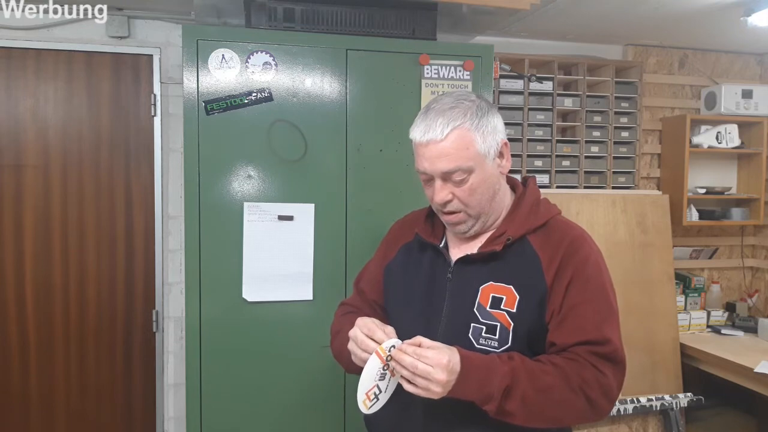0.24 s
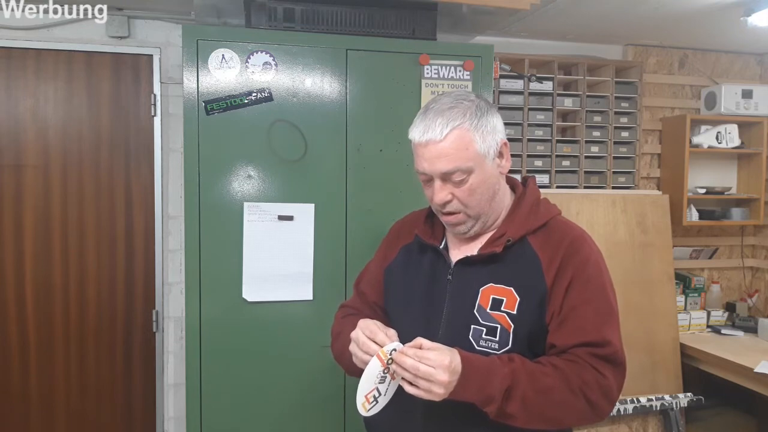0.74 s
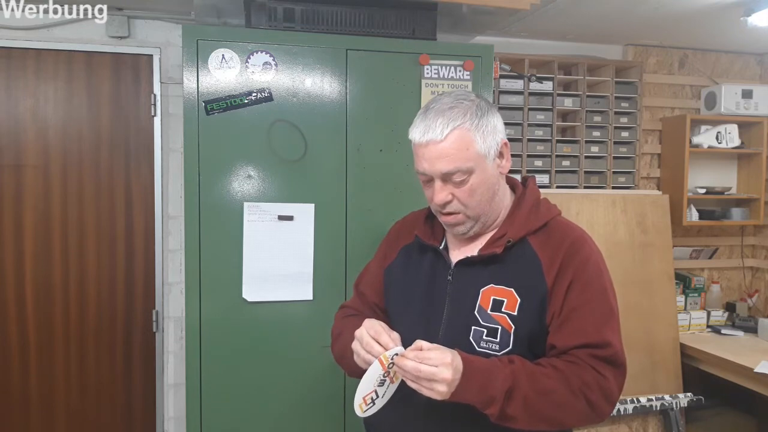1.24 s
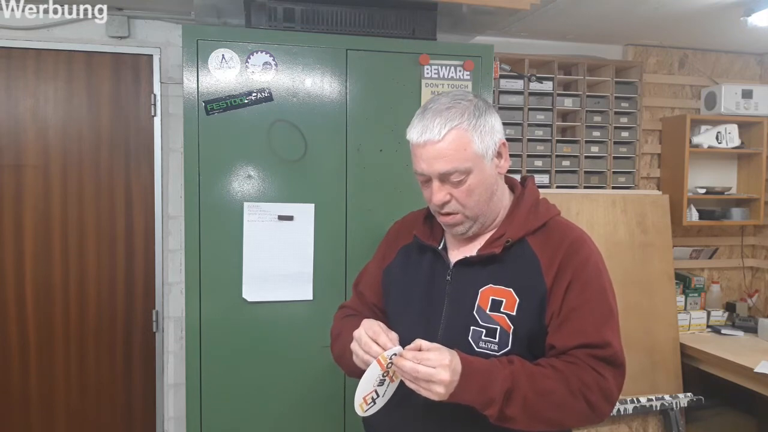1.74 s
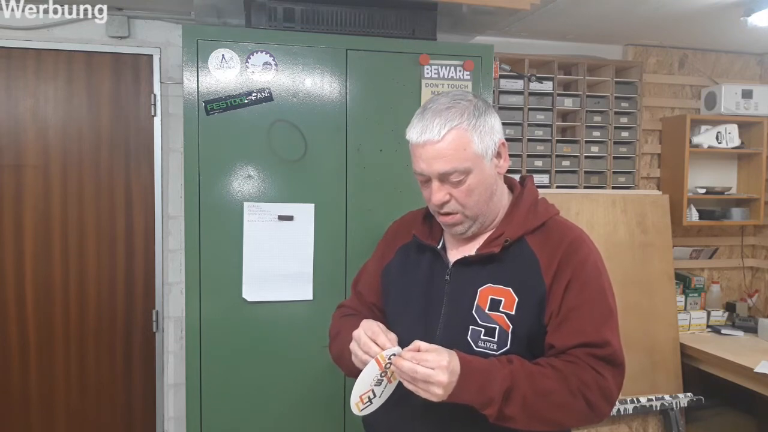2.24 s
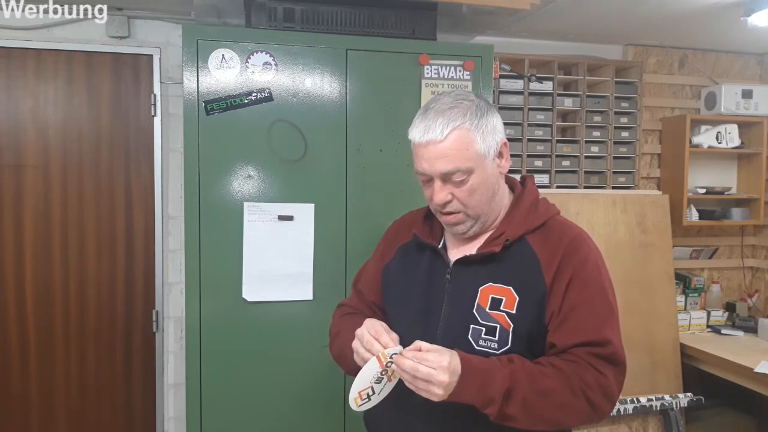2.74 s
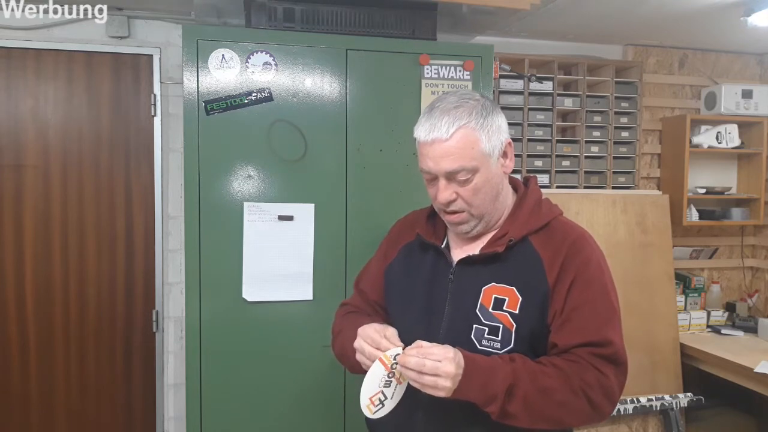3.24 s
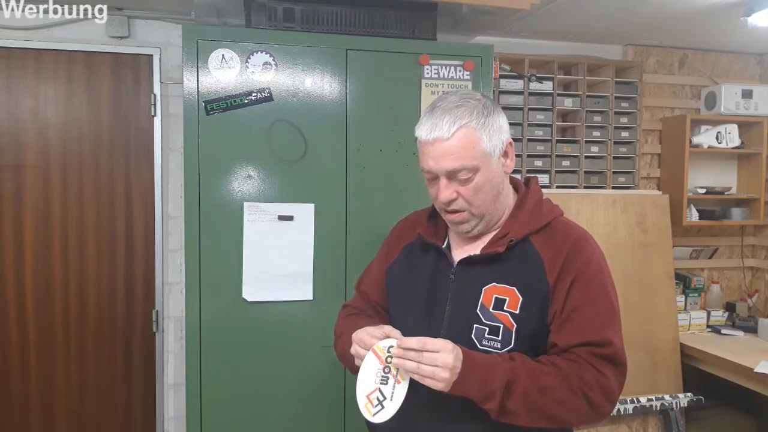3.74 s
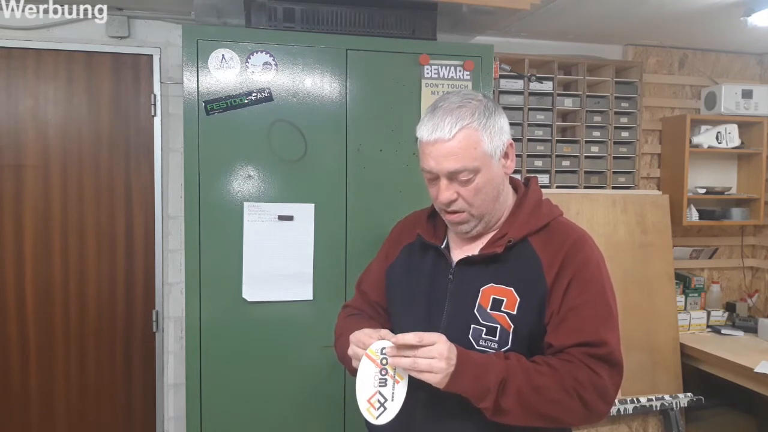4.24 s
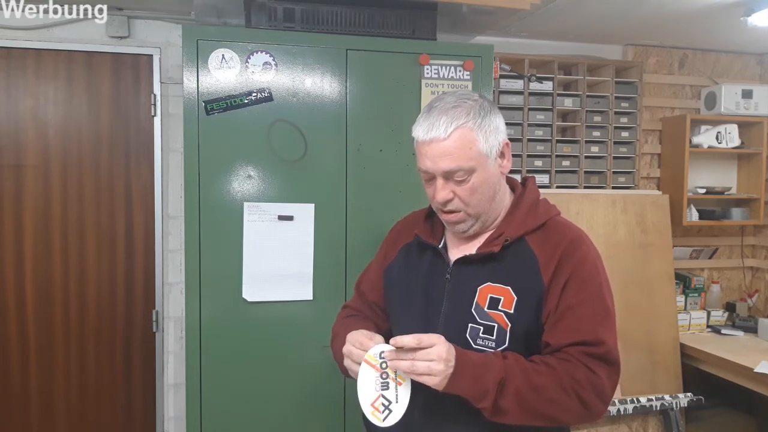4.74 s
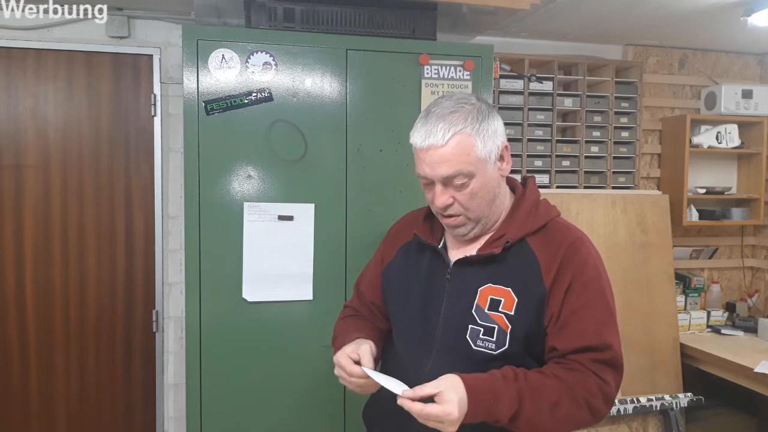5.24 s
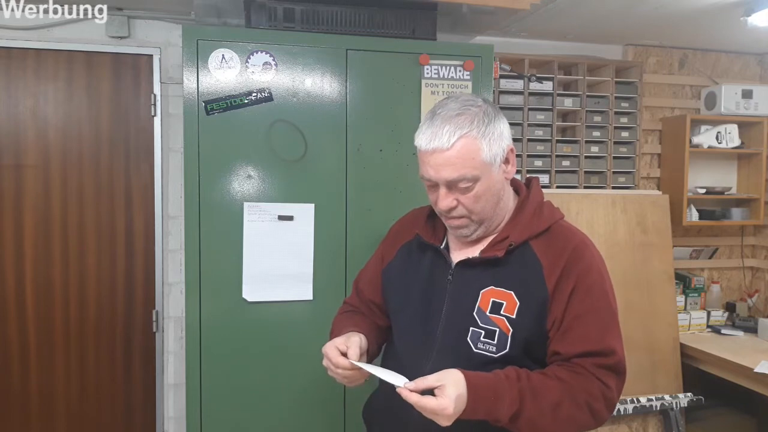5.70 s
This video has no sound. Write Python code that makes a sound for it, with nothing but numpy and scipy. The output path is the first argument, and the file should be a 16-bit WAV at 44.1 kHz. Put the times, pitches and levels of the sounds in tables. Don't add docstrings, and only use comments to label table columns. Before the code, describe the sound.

Fingernails pick at a sticker's stiff backing in a quiet workshop, with a few sharp isolated snaps between faint papery creaks and rustles.

```python
import sys
import numpy as np
from scipy import signal
from scipy.fft import rfft, irfft, next_fast_len
from scipy.io import wavfile

SR = 44100
rng = np.random.default_rng(int(sys.argv[2]) if len(sys.argv) > 2 else 0)


def ratio_of_db(decibels):
    return 10 ** (np.asarray(decibels, float) / 20)


def bounce(signal):
    frames = np.transpose(np.atleast_2d(signal))
    limited = np.clip(frames, -1, 1)
    pcm = np.round(limited * 32767).astype(np.int16)
    wavfile.write(sys.argv[1], SR, pcm)


N = 263265

# hz, density_db [dB per Hz]
HISS_SPECTRUM = [(880, -26), (1500, -7.5), (1630, -9.5), (2220, -2), (2400, -1), (10400, -5.5), (15100, -5),
                 (16000, -2.5), (16500, -36)]
# hz, density_db [dB per Hz]
HISS_SIDE_SPECTRUM = [(15, -24), (25, -9), (124, -5), (232, -14.5), (321, -13.5), (600, -14.5),
                      (651, -15.5), (1010, -16.5), (1390, -17.5), (15200, -16), (16500, -43)]
# hz, density_db [dB per Hz]
AIR_SPECTRUM = [(12, -37), (20, -13), (38, -11), (80, -4.5), (103, -1), (140, -6.5), (231, -14), (374, -10),
                (550, -16), (2000, -21.5), (2600, -57), (4400, -120)]
# low_hz, high_hz
RUMBLE_BANDS = [
    (76, 100.7),
    (100.4, 179),
    (300, 970),
    (175, 330),
]
RUMBLE_IDLE_DB = [-70, -68.5, -72.5, -86]
# peak_s, level_db, fade_s [time to lose 10 dB]
RUMBLE_SWELLS = [
    [(.37, -64.5, 0.067), (.88, -68, .2), (1.36, -54, 0.22), (1.85, -61, .15), (2.02, -58, .1),
     (2.15, -53.5, .15), (2.55, -56.5, .2), (3.32, -59, .1), (3.79, -57.5, .1), (4.37, -58.5, .1),
     (5.26, -55.5, 0.071), (5.9, -67, .1)],
    [(.22, -49.5, 0.086), (.8, -55, .2), (1.31, -51, 0.086), (2.05, -61.5, 0.087), (2.58, -54.5, .15),
     (2.95, -56.5, 0.14), (3.7, -64, 0.13), (4.37, -65, 0.087), (5.25, -63, 0.089), (5.76, -59.5, .15)],
    [(0.02, -67, 0.23), (.72, -59.5, 0.09), (.88, -50.5, 0.13), (2.12, -65, .15), (2.59, -59, 0.091),
     (3.04, -59, 0.059), (3.25, -61.5, 0.26), (3.62, -62, 0.1), (4.9, -58, .08), (5.17, -63.5, 0.072),
     (5.4, -64.5, 0.12), (5.69, -62.5, .06)],
    [(.05, -68.5, 0.28), (1.35, -66, 0.11), (1.9, -64, .15), (2.04, -64, .05), (3.7, -69, .15),
     (4.75, -67, .1)],
]
# delay_s, level_db
ECHOES = [
    (.0033, -5),
    (.007, -8.5),
    (.0103, -7),
]
# hz, t60_s
ROOM_T60 = [(150, 0.79), (500, 0.37), (2000, 0.31), (6000, 0.35), (10000, 0.36), (15000, 0.18)]
# start_s, length_s, level_db, low_hz, high_hz
FLEXES = [(.18, 0.085, -74, 109, 219), (.7, 0.27, -63, 610, 680), (.815, 0.14, -45.5, 382, 1040),
          (.87, 0.14, -57.5, 324, 440), (.85, .1, -76, 1270, 2640), (1.296, 0.022, -57.5, 100, 281),
          (2.505, 0.099, -53, 319, 710), (2.52, 0.046, -70, 755, 1230), (2.53, 0.096, -59.5, 320, 434),
          (2.587, 0.025, -54.5, 736, 856), (2.93, 0.077, -51, 305, 735), (3.12, 0.2, -66.5, 320, 505),
          (3.12, 0.29, -72.5, 1640, 2250), (3.405, 0.015, -61, 1650, 1950), (3.5, 0.2, -71, 300, 457),
          (4.78, 0.16, -65.5, 321, 473), (4.82, .37, -71.5, 600, 2220)]
# start_s, peak_db
SLIPS = [
    [(1.3075, -28), (1.3082, -27), (1.3105, -33)],
    [(2.9208, -16), (2.9213, -14), (2.922, -12)],
    [(3.4045, -48), (3.4085, -38), (3.4105, -33), (3.4185, -34), (3.425, -37), (3.4335, -38)],
    [(3.9515, -27), (3.9522, -27), (3.956, -33)],
    [(4.7152, -22), (4.7197, -12.5), (4.7219, -9), (4.7243, -14)],
]
# hz, density_db [dB per Hz]
PINCHED = [(530, -42), (900, -24), (1430, -23), (1780, -0.5), (2790, -16.5), (6080, -1.5), (8980, -9.5),
           (10600, -34), (15200, -30), (15900, -35), (16500, -62)]
# hz, density_db [dB per Hz]
BOWED = [(71, -49), (120, -19.5), (167, -9), (227, -21), (371, 1), (446, -11), (526, 2), (659, -14.5),
         (1100, -12.5), (1800, 0), (2400, -6), (4010, -7.5), (5930, -1), (14600, -11), (16200, -27.5)]
# hz, density_db [dB per Hz]
FLICKED = [(1290, -71), (2200, -22), (2490, -15), (3140, -27), (3740, -9), (4530, -12), (5090, -0.5),
           (5620, -10), (6640, -15), (7270, 0), (7970, -13.5), (8660, 1), (9250, -13), (10900, -9),
           (16000, -35)]
# hz, density_db [dB per Hz]
LOOSE = [(210, -53), (350, -17), (425, -21), (475, -13), (625, -7.5), (1420, -12.5), (1730, -3.5),
         (2380, -20), (3090, -7), (6580, -0.5), (15000, -24), (16500, -37)]
# hz, density_db [dB per Hz]
TAUT = [(160, -57), (280, -43), (361, -14), (611, -12), (1040, -21), (1310, -7), (1940, -10), (2380, -17.5),
        (3400, -7), (6150, -8), (7290, -7), (10100, -6), (11900, -1.5), (14100, -10), (16200, -27)]
SNAP_COLOURS = [PINCHED, BOWED, FLICKED, LOOSE, TAUT]
SNAP_SPREAD_DB = [-33, -31.5, -28.5, -31, -33.5]
# start_s, length_s, level_db,
# low_hz, high_hz
RUSTLES = [(1.668, 0.012, -66, 3700, 4260), (1.668, 0.017, -65, 5000, 7460), (3.84, 0.062, -66, 4440, 9450),
           (4.08, 0.084, -68.5, 5000, 10200), (4.2, 0.036, -61.5, 3570, 10000),
           (4.67, 0.057, -56, 3000, 11900), (4.86, 0.0082, -46, 4050, 13820),
           (4.95, 0.037, -64.5, 6200, 10000), (5.14, .05, -69, 5000, 10800),
           (3.404, 0.023, -58, 11500, 15800)]

AIR_DB, HISS_DB, HISS_SIDE_DB = -65.5, -66, -68
SWELL_RISE_S = 0.058
ROOM_DB, ROOM_SIDE_DB, ROOM_RISE_S = 7, -36.5, 0.0035
GATE_DB_PER_S2 = 128
HANDLING_DRY_DB = -6
CUTOFF_HZ = 16020


def at_hz(points, hz):
    table_hz, values = np.array(points).T
    return np.interp(np.log(hz + 1), np.log(table_hz), values)


def rms_one(x):
    return x / np.sqrt(np.mean(x ** 2) + 1e-20)


def band_pass(x, band_hz):
    return signal.sosfilt(signal.butter(2, band_hz, "band", fs=SR, output="sos"), x)


def coloured(x, points):
    size = next_fast_len(2 * len(x))
    spectrum = ratio_of_db(at_hz(points, np.fft.rfftfreq(size, 1 / SR)))
    cepstrum = irfft(np.log(spectrum), size)
    cepstrum[1:size // 2] *= 2
    cepstrum[size // 2 + 1:] = 0
    response = np.exp(rfft(cepstrum))
    return irfft(rfft(x, size) * response, size)[:len(x)]


def hiss():
    air = ratio_of_db(AIR_DB) * rms_one(coloured(rng.standard_normal(N), AIR_SPECTRUM))
    mid = air + ratio_of_db(HISS_DB) * rms_one(coloured(rng.standard_normal(N), HISS_SPECTRUM))
    side = ratio_of_db(HISS_SIDE_DB) * rms_one(coloured(rng.standard_normal(N), HISS_SIDE_SPECTRUM))
    return np.array([mid + side, mid - side])


def rumble(masked_db):
    t = np.arange(N) / SR
    out = np.zeros(N)
    for band, swells, idle_db in zip(RUMBLE_BANDS, RUMBLE_SWELLS, RUMBLE_IDLE_DB):
        noise = band_pass(rng.standard_normal(N + SR), band)[SR:]
        power = ratio_of_db(idle_db) ** 2
        for peak_s, level_db, fade_s in swells:
            drop = np.maximum((peak_s - t) / SWELL_RISE_S, (t - peak_s) / fade_s)
            power = power + ratio_of_db(level_db - 10 * drop) ** 2
        out += ratio_of_db(masked_db) * np.sqrt(power) * rms_one(noise)
    return out


def room_tails(count):
    t = np.arange(SR // 2) / SR
    edges = 80 * 2 ** np.arange(0, 8.1, .5)
    white = rng.standard_normal((2, count, 2, len(t)))
    tail = 0
    for k, (low, high) in enumerate(zip(edges, edges[1:])):
        t60 = at_hz(ROOM_T60, np.sqrt(low * high))
        tail = tail + band_pass(white[k % 2], [low, high]) * ratio_of_db(-60 * t / t60)
    tail = tail * (1 - np.exp(-t / ROOM_RISE_S)) * ratio_of_db(-GATE_DB_PER_S2 * t ** 2)
    mid, side = tail[:, 0], ratio_of_db(ROOM_SIDE_DB) * tail[:, 1]
    energy = np.mean(np.sum(mid ** 2, axis=1))
    return np.stack([mid + side, mid - side], axis=1) / np.sqrt(energy)


def workshop(direct, into_room, tail):
    early = np.zeros(1024)
    early[0] = 1
    for delay_s, echo_db in ECHOES:
        early[round(delay_s * SR)] = ratio_of_db(echo_db)
    out = ratio_of_db(ROOM_DB) * signal.fftconvolve(into_room[None], tail, axes=1)
    out[:, :len(direct)] += signal.fftconvolve(direct, early)[:len(direct)]
    return out


def strokes(rows, grains_per_s, spread_db):
    out = np.zeros(N)
    size = 16384
    for start_s, length_s, level_db, low_hz, high_hz in rows:
        count = round(length_s * SR)
        grain_db = spread_db * np.minimum(rng.exponential(1, size), 4)
        grains = ratio_of_db(grain_db) * rng.choice([-1, 1], size)
        grains *= rng.random(size) < grains_per_s / SR
        grains[:count] *= np.hanning(count) ** .75
        grains[count:] = 1e-18
        band = signal.cheby1(3, 1, [low_hz, min(high_hz, .45 * SR)], "band", fs=SR, output="sos")
        stroke = signal.sosfilt(band, grains)
        stroke_rms = np.sqrt(np.mean(stroke[:count] ** 2))
        out[round(start_s * SR):][:size] += ratio_of_db(level_db) * stroke / stroke_rms
    return out


def flexes():
    return strokes(FLEXES, grains_per_s=1200, spread_db=5.0)


def snaps():
    out = np.zeros((2, N + SR))
    t = np.arange(4096) / SR
    click = 1. * (t == 0)
    tails = iter(room_tails(count=sum(map(len, SLIPS))))
    for slips, colour, spread_db in zip(SLIPS, SNAP_COLOURS, SNAP_SPREAD_DB):
        for start_s, peak_db in slips:
            chatter = .5 * rng.standard_normal(4096) * np.exp(-t / .00045)
            heard = coloured(click + chatter, colour)
            heard = signal.lfilter([1, -.45], [1], heard)
            heard = ratio_of_db(peak_db) * heard / np.abs(heard).max()
            spread = ratio_of_db(peak_db + spread_db) * rms_one(coloured(click, colour))
            sound = workshop(heard, spread, next(tails))
            out[:, round(start_s * SR):][:, :sound.shape[1]] += sound
    return out[:, :N]


def rustles():
    return strokes(RUSTLES, grains_per_s=4400, spread_db=2.5)


def scene():
    handling = flexes() + rustles()
    direct = ratio_of_db(HANDLING_DRY_DB) * handling
    into_room = ratio_of_db(-ROOM_DB - 2.5) * handling
    handled = workshop(direct, into_room, room_tails(count=1)[0])[:, :N]
    return snaps() + handled + hiss() + rumble(masked_db=-4.0)


def top_cut(x):
    return signal.sosfilt(signal.butter(12, 16790, fs=SR, output="sos"), x)


def record(dry):
    low_pass = signal.cheby2(16, 34, CUTOFF_HZ, fs=SR, output="sos")
    mix = signal.sosfilt(low_pass, dry)
    return top_cut(mix)


dry = scene()
out = record(dry)
bounce(out)
```